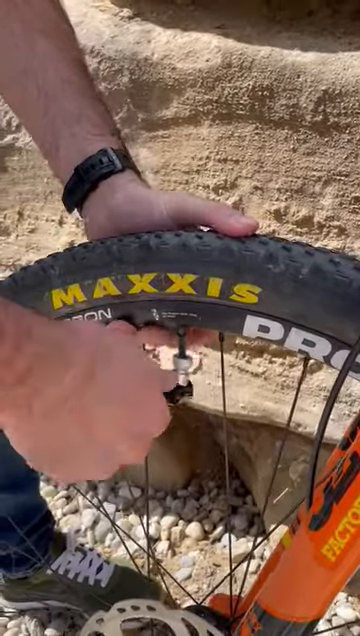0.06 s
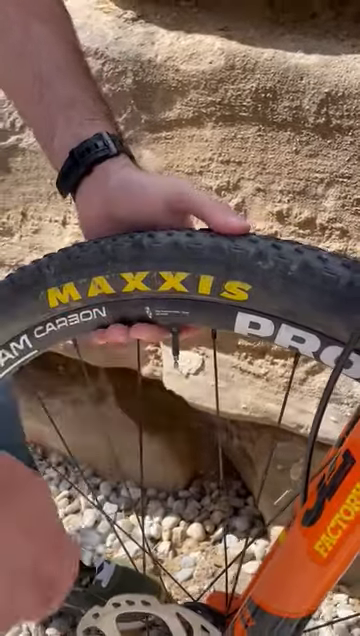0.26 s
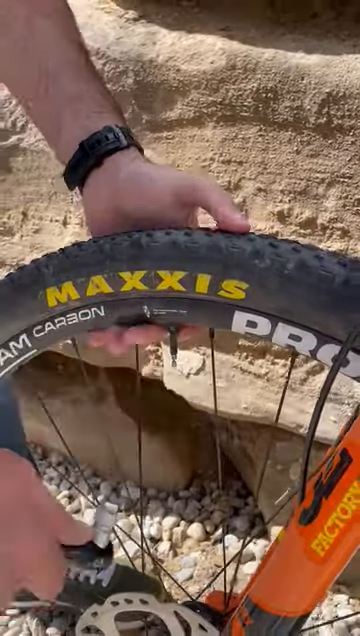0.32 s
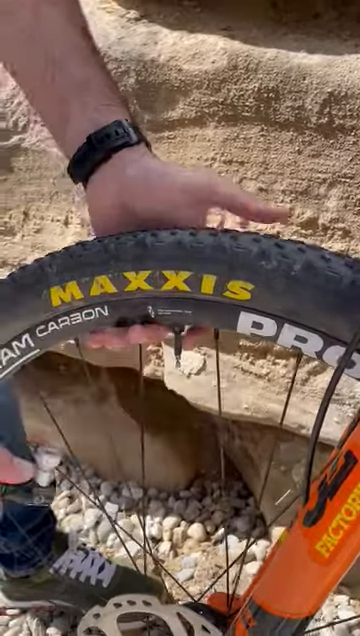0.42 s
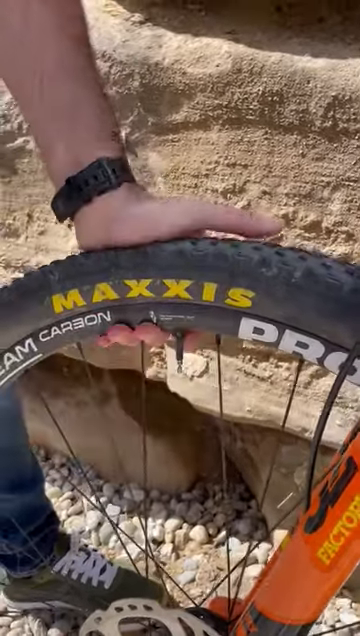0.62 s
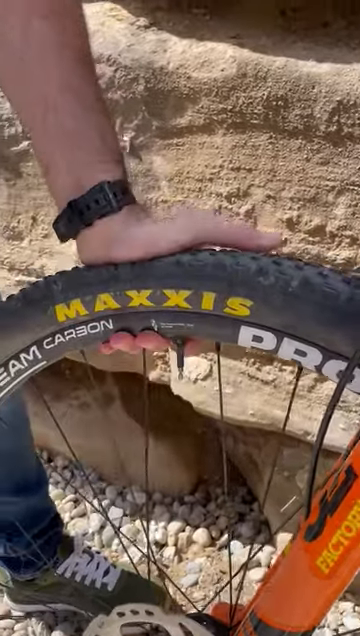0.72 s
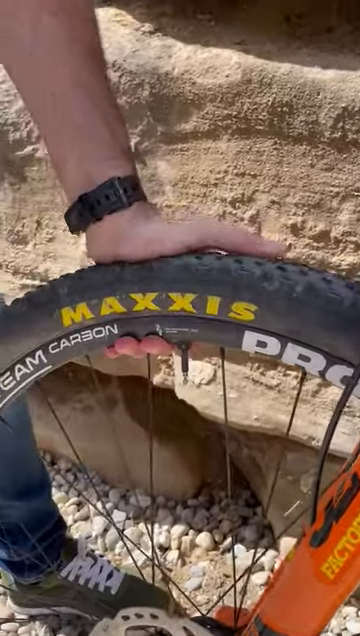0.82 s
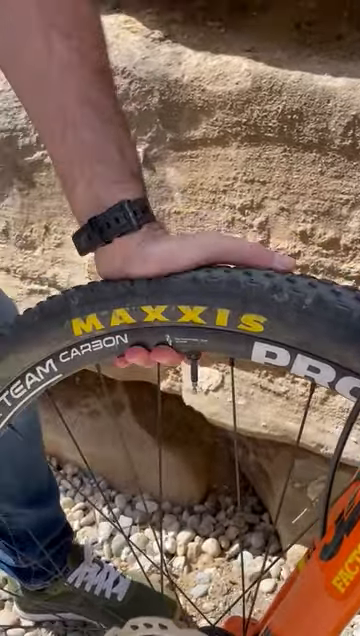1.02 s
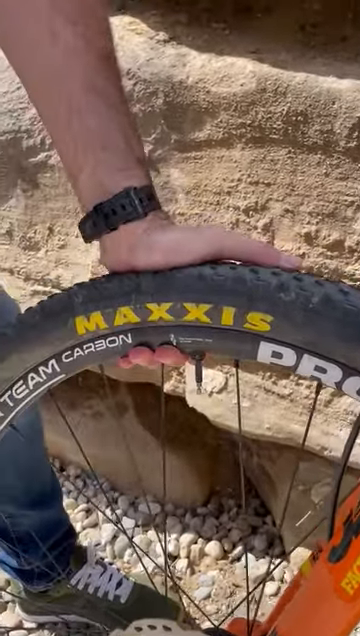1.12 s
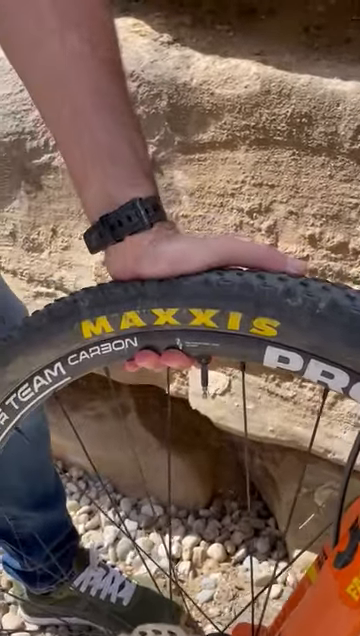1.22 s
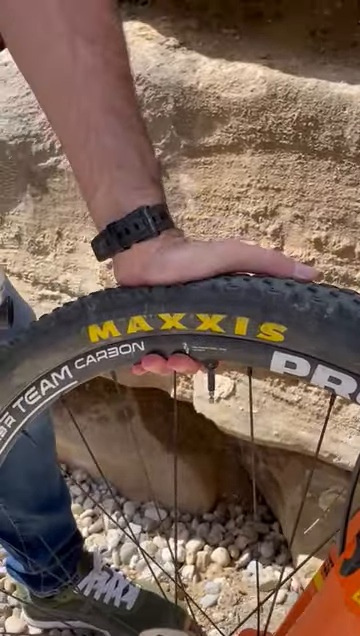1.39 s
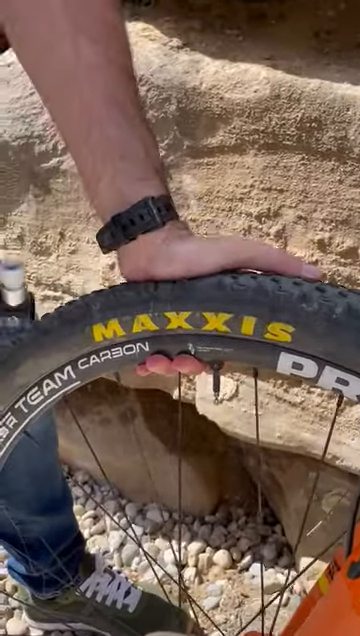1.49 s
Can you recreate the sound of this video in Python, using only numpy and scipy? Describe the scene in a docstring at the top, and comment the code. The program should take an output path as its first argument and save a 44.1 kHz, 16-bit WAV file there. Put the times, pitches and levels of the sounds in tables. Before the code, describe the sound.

A gas inflator pops off a bicycle valve after a brief hiss of leaking gas. The tyre thumps and the spokes ring briefly, then a hand scuffs faintly on the rubber. Heard close, over soft outdoor hiss.

```python
"""A short hiss, then a pop: a gas inflator is pulled off a bicycle valve, outdoors beside a rock face.
Gas leaks past the seal; the head ticks as it slides, then lets go in a run of snaps.
The tyre thumps, rim and spokes ring, the rock echoes the snaps. A hand shifts on the tyre with
small scuffs, bumps and a faint squeak. Soft outdoor hiss and low rumble lie underneath."""
import sys
import numpy as np
from scipy import signal
from scipy.fft import rfft, irfft
from scipy.io import wavfile
from scipy.ndimage import uniform_filter1d

SR = 44100
rng = np.random.default_rng(int(sys.argv[2]) if len(sys.argv) > 2 else 0)


def transcribe(u):
    """Save the signal u as a 16-bit wav file named by the first command-line argument.

    u: samples, shape (n,) or (channels, n), limited to [-1, 1]; the rate is SR.
    q: integer samples, one column per channel.
    """
    v = np.clip(np.atleast_2d(u).T, -1, 1)
    q = np.round(v * 32767).astype(np.int16)
    wavfile.write(sys.argv[1], SR, q)


N = 68355
T = np.arange(N) / SR
HZ = np.fft.rfftfreq(2 * N, 1 / SR)

# Noise envelopes. Each row: time in seconds, level in dB.
RUMBLE_LEVEL = [(0, -58.5), (.12, -57.5), (.2, -46.5), (.26, -61.5), (.39, -60), (.52, -69.5), (.7, -63.5),
                (.88, -63.5), (1.15, -68), (1.3, -59), (1.42, -65.5), (1.52, -58)]
AIR_LEVEL = [(0, -67.5), (.18, -63), (.3, -58.5), (.48, -61.5), (.63, -64), (.8, -59.5), (.93, -61),
             (1.02, -64), (1.12, -63), (1.23, -63), (1.26, -66.5), (1.55, -66.5)]
FIZZ_LEVEL = [(.25, -70.5), (.45, -72.5), (.62, -72.5), (.83, -73), (.95, -64), (1.02, -71.5), (1.16, -68),
              (1.27, -74), (1.42, -76), (1.5, -70.5)]
LEAK_LEVEL = [(0, -49), (.018, -51), (.045, -43.5), (.075, -42), (.096, -44.5), (.108, -57.5), (.166, -56),
              (.18, -105)]

# Source spectra. Each row: frequency in Hz, relative density in dB.
RUMBLE_SPECTRUM = [(15, -40.5), (35, -13), (62, 5.5), (90, -5.5), (130, -15.5), (300, -28), (1000, -114)]
AIR_SPECTRUM = [(100, 5), (300, -1.5), (600, 0.5), (1400, -6.5), (2100, -5), (3500, -4.5), (4400, -7.5),
                (5300, -3.5), (6300, -7.5), (7500, -19), (8600, -6.5), (9500, -34), (12000, -45.5)]
FIZZ_SPECTRUM = [(6000, -26), (8000, -6.5), (9200, 3), (11000, 2), (11700, -6.5), (12100, -26)]
SCUFF_SPECTRUM = [(100, 0), (250, -3), (520, -7), (900, 3.5), (1500, -7.5), (2400, 1.5), (3500, -16.5),
                  (6000, -8), (12000, -43)]
BUMP_SPECTRUM = [(50, -15.5), (150, 5.5), (330, -4.5), (600, -23.5), (2000, -88)]
TICK_SPECTRUM = [(400, -7.5), (2000, -8), (4200, -9.5), (5400, 7.5), (6400, -3), (8000, 0.5),
                 (10000, -14.5), (12000, -17)]
LEAK_SPECTRUM = [(150, -2.5), (400, -11), (560, -22.5), (1100, -1.5), (2000, -1), (2700, 1.5), (3500, -2.5),
                 (4300, 2), (5400, 5), (6600, -1.5), (8200, 1), (9300, 4.5), (12000, 1.5)]
SNAP_SPECTRUM = [(200, -17), (380, -14.5), (540, -26), (660, -1), (850, -3), (1000, -12), (1250, -5),
                 (1800, 1), (2600, 0), (3150, -23.5), (3500, -18), (4400, -17.5), (4900, -18.5),
                 (7500, -20), (11000, -27.5), (12000, -42)]

# Soft, deep thuds and puffs in the rumble.
# Each row: start in seconds, length in seconds, frequency in Hz, level in dB.
LOW_THUDS = [(.04, 0.035, 64.7, -54), (.166, .04, 73, -44.5), (.305, 0.035, 67, -46.5),
             (.43, 0.075, 85, -56), (1.485, 0.046, 80, -51.5)]
# Hand and shoe scuffs, wheel bumps. Each row: start in seconds, level in dB, T60 in seconds.
SCUFF_EVENTS = [(0.0904, -47.5, 0.081), (0.204, -47, 0.09), (.740, -56, 0.066), (0.782, -59, 0.022),
                (0.7939, -45, 0.0098), (0.804, -54.5, 0.072), (1.078, -57, .07), (1.462, -58, 0.018)]
BUMP_EVENTS = [(0.09, -55.5, 0.16), (0.316, -59.5, 0.31), (0.807, -55, 0.12), (1.232, -68, 1),
               (1.529, -51, 0.054)]
# Ticks of head and grit, snaps off the valve. Each row: start in seconds, relative level in dB.
TICK_EVENTS = [(0.1292, -40), (.158, -45), (0.1934, -34.5), (0.1972, -43), (.739, -48), (0.7503, -49.5),
               (0.7938, -51.5), (.8635, -61)]
SNAP_EVENTS = [(.2120, -27), (0.2147, -29.5), (0.2169, -25.5), (0.2174, -21), (.2210, -22), (.2236, -25.5),
               (0.2284, -30.5)]

# Modes of the tyre-damped rim and valve, the spokes and the air in the tyre.
# Each row: frequency in Hz, level in dB, T60 in seconds.
RIM_MODES = [(655.5, -39.5, 0.12), (803.5, -29, 0.05), (1185, -28, .07), (1267, -33.5, 0.099),
             (1524, -39, 0.063), (1753, -28, 0.084), (1962, -42, 0.19), (2260, -28, 0.022),
             (2430, -25, 0.037), (2618, -26.5, 0.024), (2770, -36, 0.05)]
SPOKE_MODES = [(439, -51, 0.5), (496.5, -66, 1), (618, -71, 0.48), (909, -53.5, 0.46), (1093, -54, 0.52),
               (1250, -52, 0.95), (1277, -53, 0.59), (1467, -38.5, 0.23), (1678, -46, 0.5),
               (1760, -41.5, 0.29), (1876, -39.5, 0.39), (2270, -48, 0.23), (2700, -36.5, 0.15)]
TYRE_AIR_MODES = [(136, -45, 0.26), (170.4, -35.5, 0.2), (234.5, -43.5, 0.24)]

# Left-right likeness by frequency; the highest treble is nearly mono.
# Each row: frequency in Hz, near coherence 0-1, diffuse coherence 0-1.
STEREO_COHERENCE = [(60, .998, .997), (200, .9996, .997), (380, .98, .75), (570, .55, .4), (900, .85, .5),
                    (1300, .97, .75), (1900, .96, .88), (2550, .72, .55), (3400, .8, .25), (4300, .8, .5),
                    (5000, .78, .6), (6100, .75, .75), (6900, .99, .997), (8600, .99, .997),
                    (9300, .75, .7), (10200, .97, .995), (12000, .995, .999)]
# Phase between the channels. Each row: frequency in Hz, left lead in radians.
STEREO_PHASE = [(350, 0), (800, .3), (1300, .05), (1900, .08), (2550, 1.3), (3400, .3), (4300, 1.3),
                (5000, .3), (6100, 1.1), (6900, 3.1), (8600, 3.18), (9300, 4.9), (10200, 6.2),
                (12000, 6.28)]


def amp(db):
    """Decibels to gain."""
    return 10 ** (np.asarray(db) / 20)


def over_hz(table, column=1):
    """Table column interpolated on a log frequency axis."""
    rows = np.array(table)
    return np.interp(np.log(HZ + 1), np.log(rows[:, 0]), rows[:, column])


def level(table):
    """Level curve as gain over time."""
    return amp(np.interp(T, *np.transpose(table)))


def decay(start_s, db, t60_s):
    """Sudden start, exponential fall."""
    return (T >= start_s) * amp(db - 60 * np.maximum(T - start_s, 0) / t60_s)


def drift(window_samples):
    """Smoothed noise of unit deviation."""
    smooth = uniform_filter1d(rng.standard_normal(N), size=window_samples)
    return smooth / smooth.std()


def flutter(depth_db):
    """Quick random unevenness of a hiss, as gain."""
    return amp(depth_db * drift(window_samples=200))


def coloured(x, spectrum):
    """Minimum-phase filter that keeps the power of white noise."""
    gain = amp(over_hz(spectrum))
    log_gain = np.log(gain / np.sqrt(np.mean(gain ** 2)))
    mirrored = np.r_[log_gain, log_gain[-2:0:-1]]
    response = np.exp(np.conj(signal.hilbert(mirrored)))[:N + 1]
    return irfft(rfft(x, 2 * N) * response)[..., :N]


def noise(spectrum, envelope, diffuse=False):
    """Shaped stereo noise; the channels are less alike when it comes from all around."""
    mid, side = rfft(rng.standard_normal((2, N)) * envelope, 2 * N)
    coherence = over_hz(STEREO_COHERENCE, column=2 if diffuse else 1)
    mid *= np.sqrt((1 + coherence) / 2)
    side *= np.sqrt((1 - coherence) / 2)
    stereo = irfft(np.array([mid + side, mid - side]))[:, :N]
    return coloured(stereo, spectrum)


def low_thud(start_s, length_s, hz, db):
    """A soft, deep thud or puff, a few cycles long."""
    t = T - start_s
    swell = np.sin(np.pi * np.clip(t / length_s, 0, 1)) ** 2
    return amp(db) * swell * np.sin(2 * np.pi * hz * t)


def rumble():
    """Low noise that swells and fades, with a few thuds in it."""
    return noise(RUMBLE_SPECTRUM, level(RUMBLE_LEVEL)) + sum(low_thud(*row) for row in LOW_THUDS)


def outdoor_hiss():
    """Soft hiss and faint high fizz from all around."""
    air = noise(AIR_SPECTRUM, level(AIR_LEVEL) * flutter(depth_db=1.34), diffuse=True)
    fizz = noise(FIZZ_SPECTRUM, level(FIZZ_LEVEL) * flutter(depth_db=1.1), diffuse=True)
    return air + fizz


def squeak(start_s, length_s, hz, db, second_db=-8, waver=.01):
    """Faint wavering squeak: second and third harmonics only."""
    pitch_hz = hz * (1 + waver * drift(window_samples=300))
    phase = 2 * np.pi * np.cumsum(pitch_hz) / SR
    swell = np.sin(np.pi * np.clip((T - start_s) / length_s, 0, 1))
    return amp(db) * swell * (np.sin(3 * phase) + amp(second_db) * np.sin(2 * phase))


def handling():
    """Hand and shoe scuffs, soft bumps and one squeak."""
    scuffs = noise(SCUFF_SPECTRUM, sum(decay(*row) for row in SCUFF_EVENTS))
    bumps = noise(BUMP_SPECTRUM, sum(decay(*row) for row in BUMP_EVENTS))
    return scuffs + bumps + squeak(start_s=1.138, length_s=.058, hz=662, db=-61)


def ticks(t60_s=.015):
    """The sliding metal head and grit tick in short, bright bursts."""
    return noise(TICK_SPECTRUM, sum(decay(start_s, db, t60_s) for start_s, db in TICK_EVENTS))


def seal_leak():
    """Gas hisses unevenly past the seal."""
    return noise(LEAK_SPECTRUM, level(LEAK_LEVEL) * flutter(depth_db=1.55))


def rock_echo(x, gain_db=-9.5, delay_s=.008, t60_s=.21, cutoff_hz=3400):
    """Short, dull scatter from rock and gravel."""
    scatter = rng.standard_normal((3, N)) * decay(delay_s, 0, t60_s)
    common, per_channel = scatter[0], scatter[1:]
    tail = common + .25 * per_channel
    tail /= np.linalg.norm(tail[0])
    tail = signal.sosfilt(signal.butter(3, cutoff_hz, fs=SR, output="sos"), tail)
    return amp(gain_db) * signal.fftconvolve(x, tail, axes=1)[:, :N]


def wheel_ring(modes, start_s=.2165, rise_s=.0024):
    """Damped modes set off by the pop."""
    t = np.maximum(T - start_s, 0)
    attack = np.minimum(t / rise_s, 1)
    return attack * sum(amp(db - 60 * t / t60_s) * np.sin(2 * np.pi * hz * t) for hz, db, t60_s in modes)


def tyre_thump(start_s=.2145, db=-32.5, rise_s=.0068, start_hz=495, end_hz=143.7, sag_s=.006):
    """The tyre springs back: a short low tone that sags in pitch."""
    t = np.maximum(T - start_s, 0)
    pitch_hz = end_hz + (start_hz - end_hz) * np.exp(-t / sag_s)
    phase = 2 * np.pi * np.cumsum(pitch_hz * (t > 0)) / SR
    envelope = (t / rise_s * np.exp(1 - t / rise_s)) ** 2
    return amp(db) * envelope * np.sin(phase)


def seal_snaps(click_gain_db=6, spit_gain_db=-2.5, spit_t60_s=.015):
    """The seal lets go in quick snaps, each a click and a spit of gas."""
    impulses = sum(amp(db) * np.sinc((T - start_s) * SR) for start_s, db in SNAP_EVENTS)
    clicks = coloured(impulses, SNAP_SPECTRUM)
    spits = noise(SNAP_SPECTRUM, sum(decay(start_s, db, spit_t60_s) for start_s, db in SNAP_EVENTS))
    return amp(click_gain_db) * clicks + amp(spit_gain_db) * spits


def pop():
    """The head comes off: snaps and their echo, ringing wheel, tyre thump."""
    snaps = seal_snaps()
    ringing = wheel_ring(RIM_MODES) + wheel_ring(SPOKE_MODES) + wheel_ring(TYRE_AIR_MODES)
    return snaps + rock_echo(snaps) + ringing + tyre_thump()


def scene():
    """Leak, pop, ticks and handling over the outdoor background."""
    return seal_leak() + outdoor_hiss() + pop() + ticks() + handling() + rumble()


def record(dry):
    """Left-right phase difference, then a band limit."""
    phase_shift = np.exp(1j * np.outer([.5, -.5], over_hz(STEREO_PHASE)))
    heard = irfft(rfft(dry, 2 * N) * phase_shift)[:, :N]
    cutoff_hz = 12250
    lowpass = signal.firwin(401, cutoff_hz, window=("kaiser", 9), fs=SR)
    return signal.oaconvolve(heard, lowpass[None], "same")


dry = scene()
out = record(dry)
transcribe(out)
```